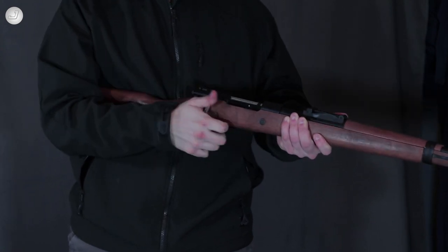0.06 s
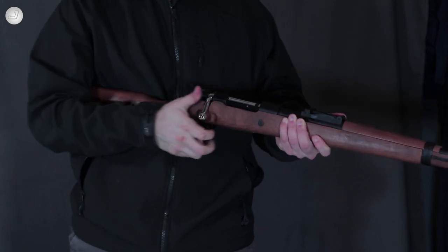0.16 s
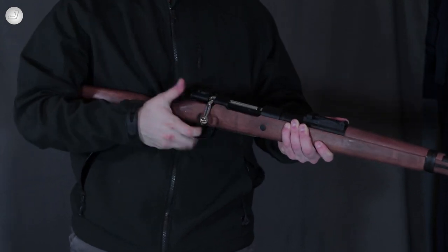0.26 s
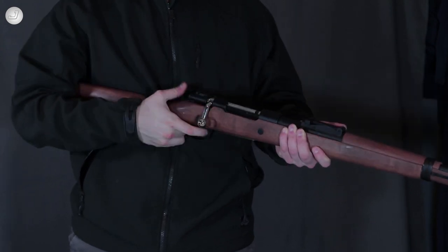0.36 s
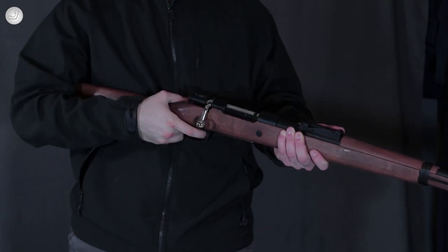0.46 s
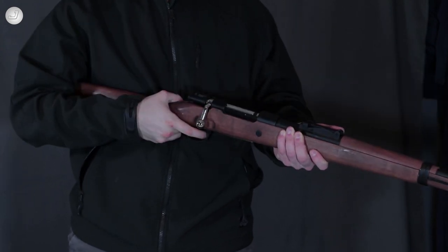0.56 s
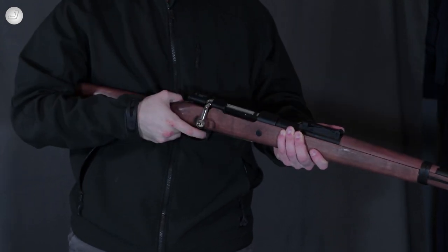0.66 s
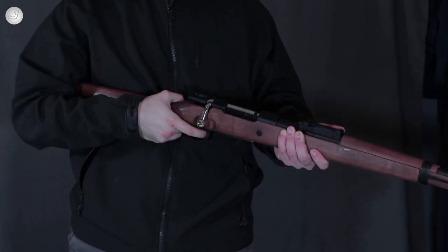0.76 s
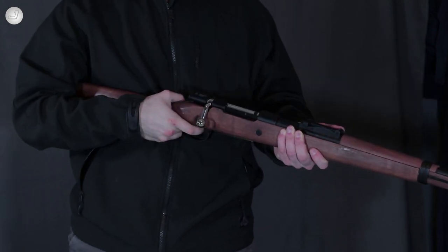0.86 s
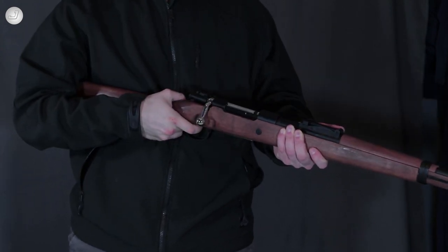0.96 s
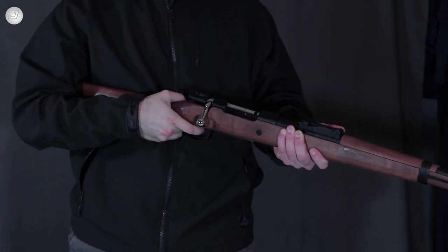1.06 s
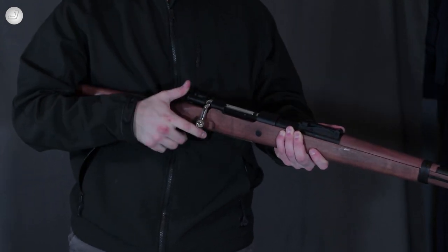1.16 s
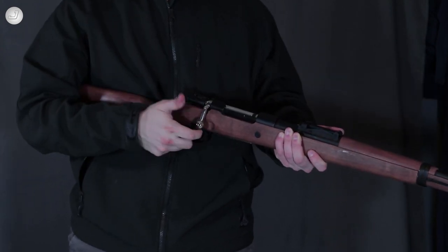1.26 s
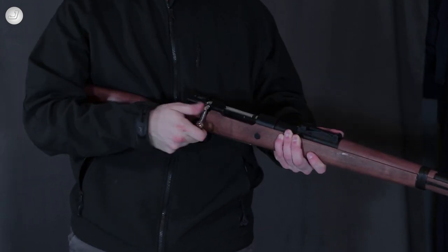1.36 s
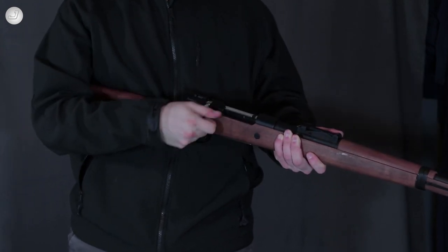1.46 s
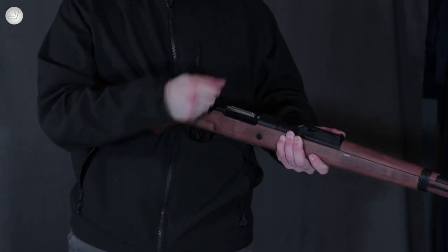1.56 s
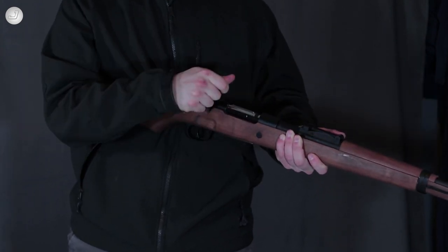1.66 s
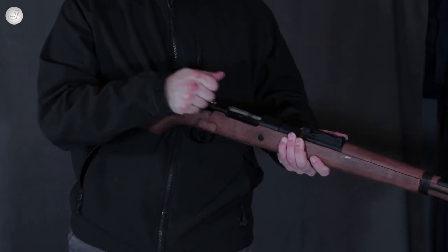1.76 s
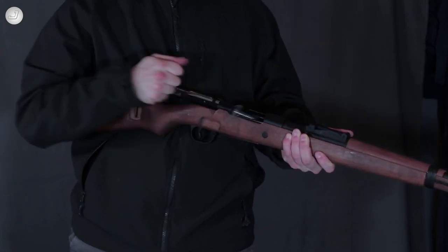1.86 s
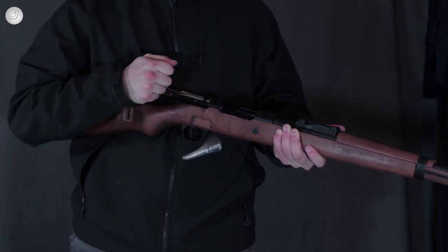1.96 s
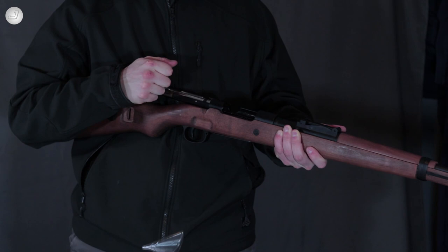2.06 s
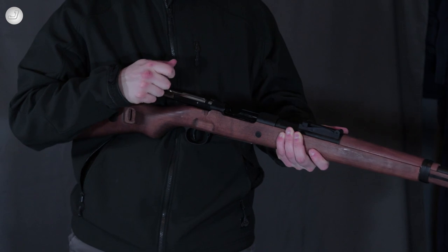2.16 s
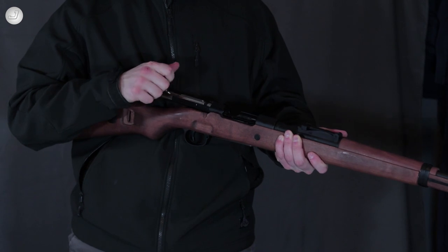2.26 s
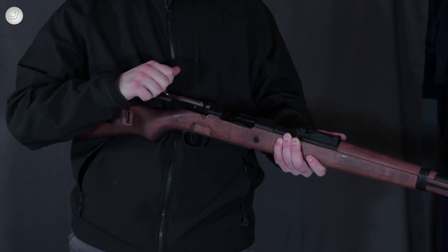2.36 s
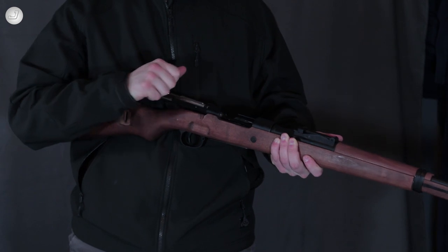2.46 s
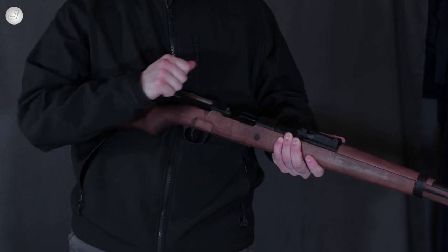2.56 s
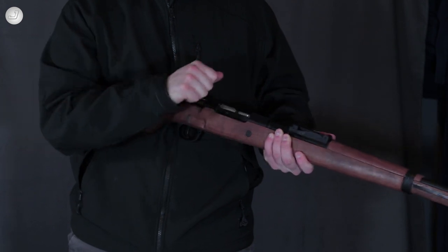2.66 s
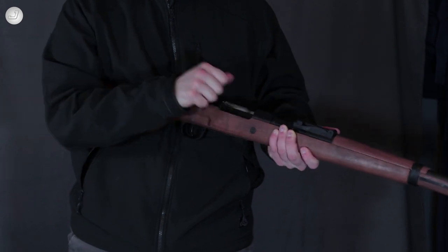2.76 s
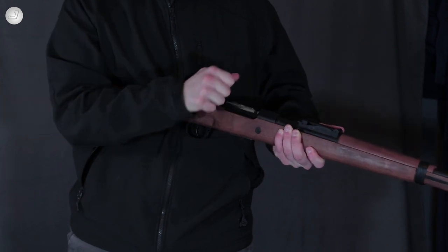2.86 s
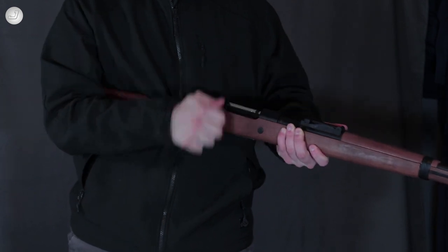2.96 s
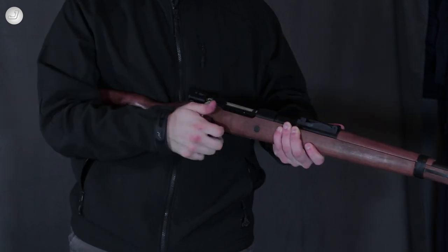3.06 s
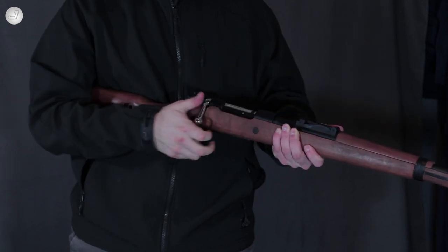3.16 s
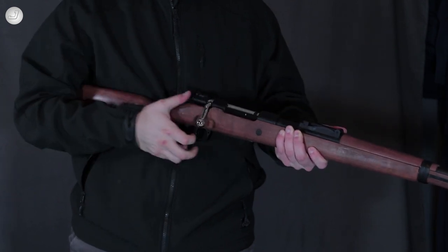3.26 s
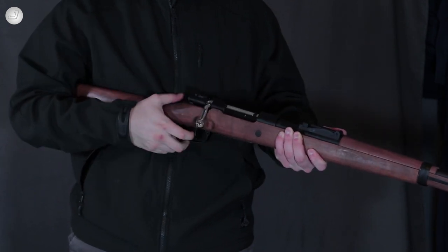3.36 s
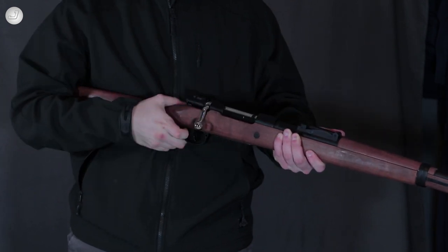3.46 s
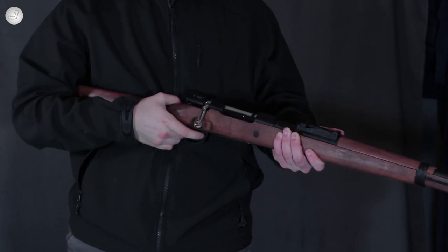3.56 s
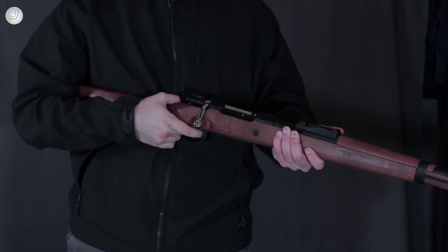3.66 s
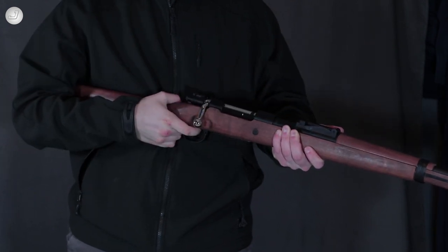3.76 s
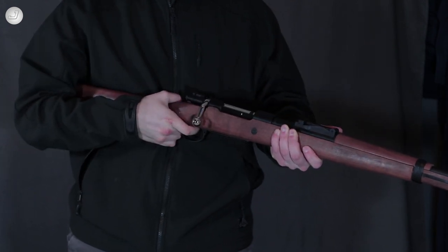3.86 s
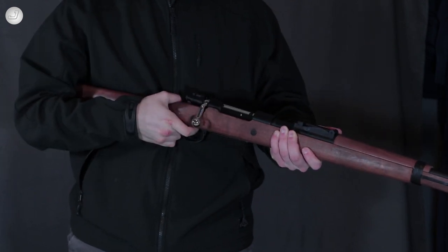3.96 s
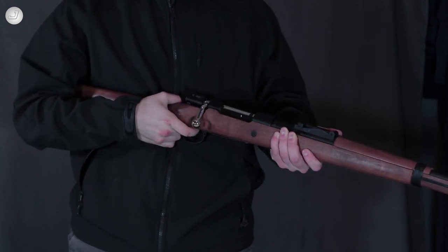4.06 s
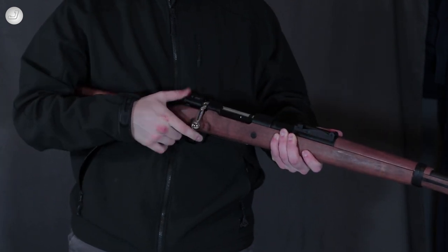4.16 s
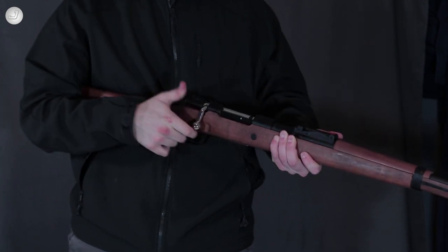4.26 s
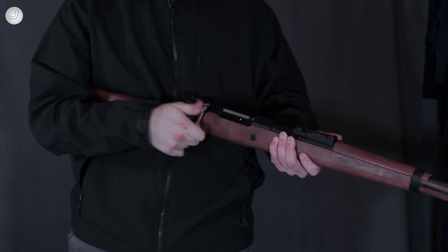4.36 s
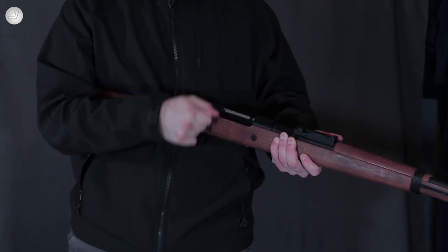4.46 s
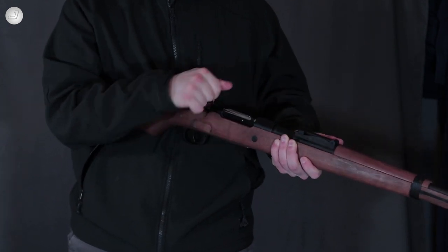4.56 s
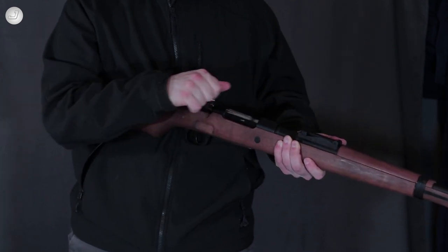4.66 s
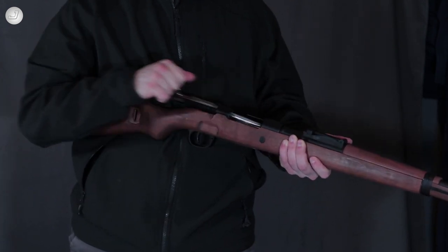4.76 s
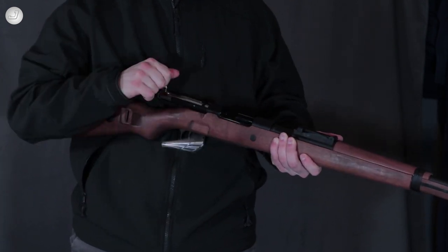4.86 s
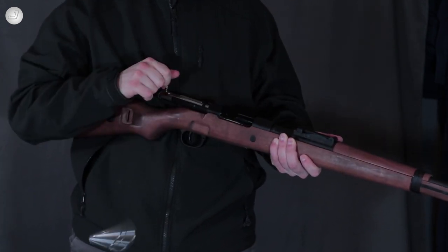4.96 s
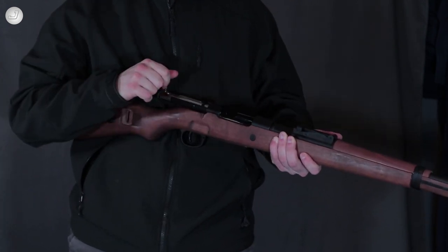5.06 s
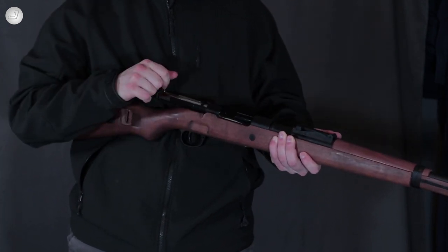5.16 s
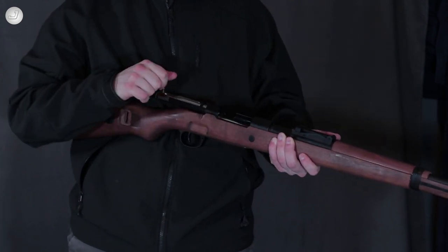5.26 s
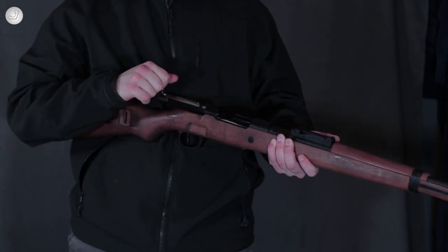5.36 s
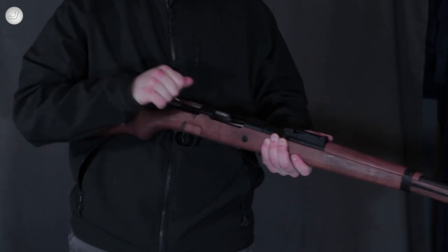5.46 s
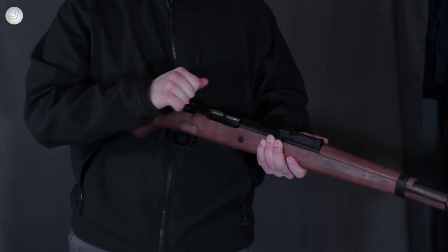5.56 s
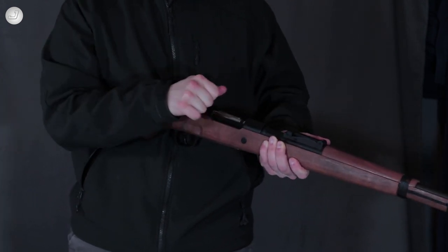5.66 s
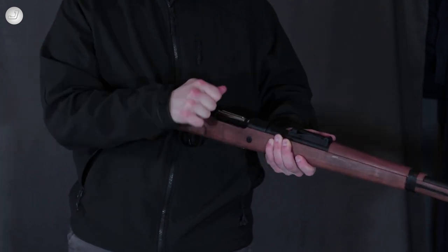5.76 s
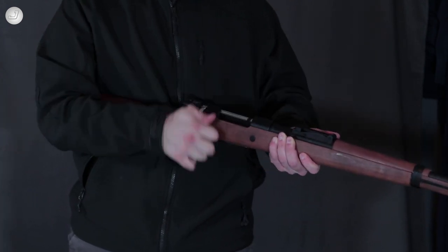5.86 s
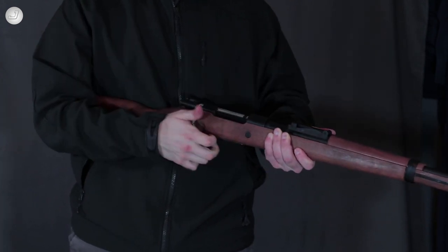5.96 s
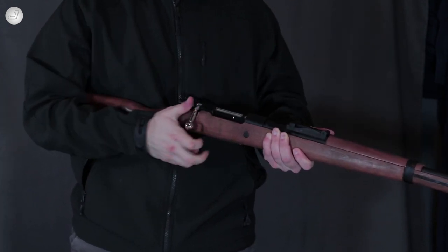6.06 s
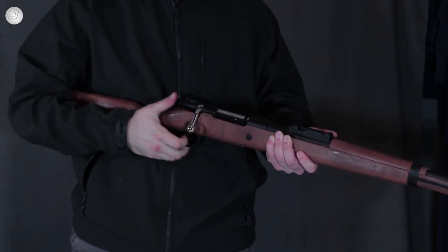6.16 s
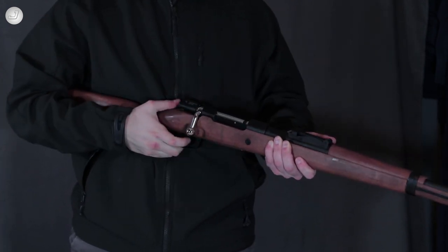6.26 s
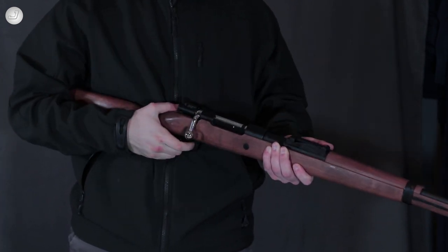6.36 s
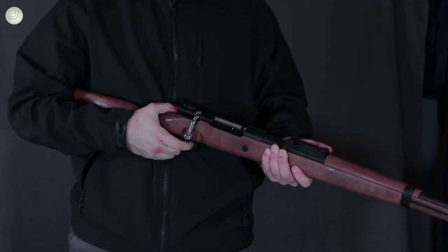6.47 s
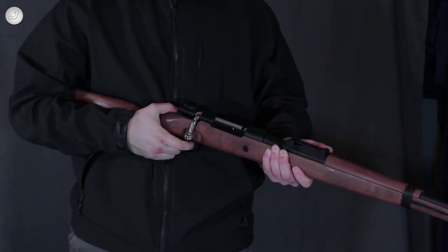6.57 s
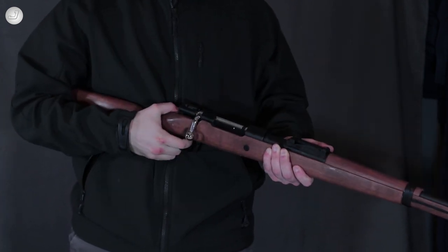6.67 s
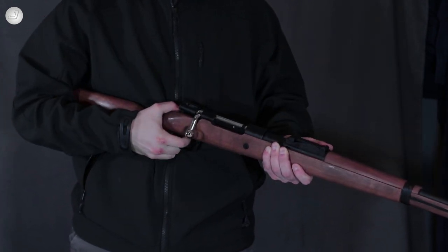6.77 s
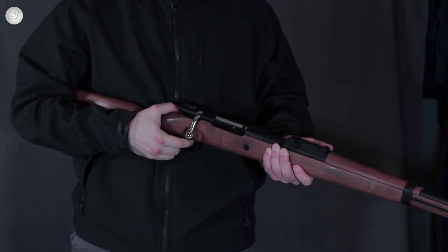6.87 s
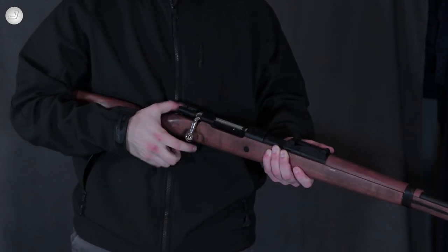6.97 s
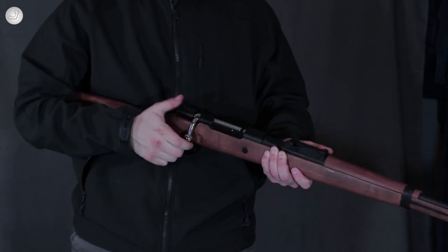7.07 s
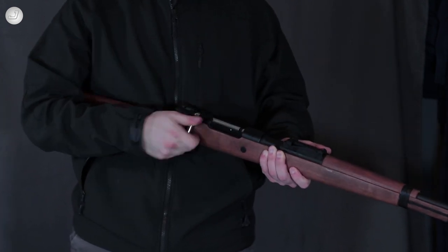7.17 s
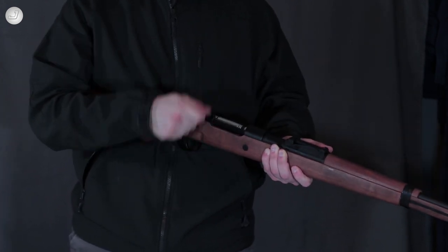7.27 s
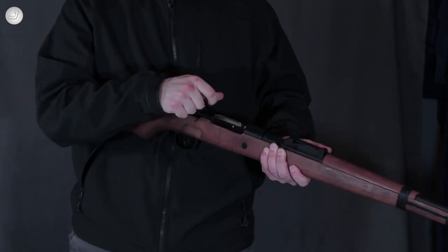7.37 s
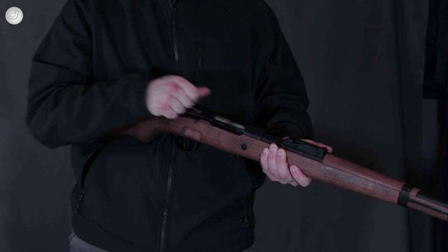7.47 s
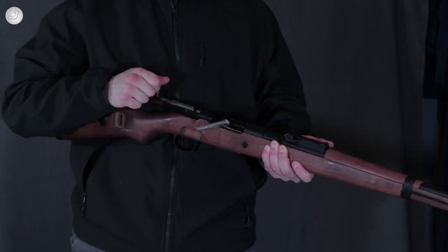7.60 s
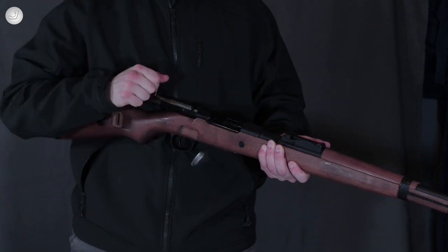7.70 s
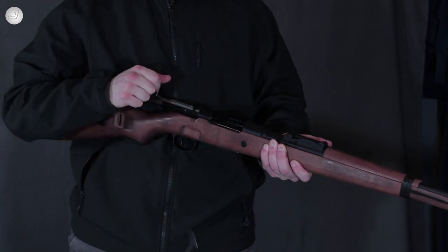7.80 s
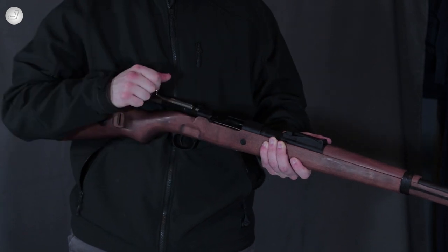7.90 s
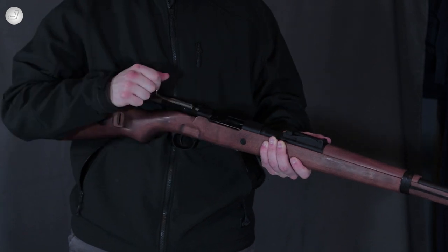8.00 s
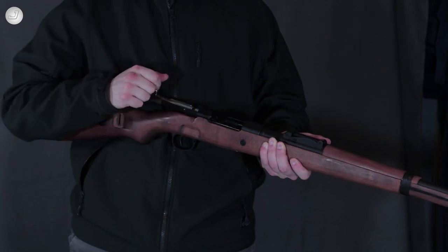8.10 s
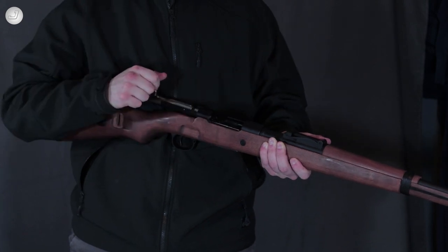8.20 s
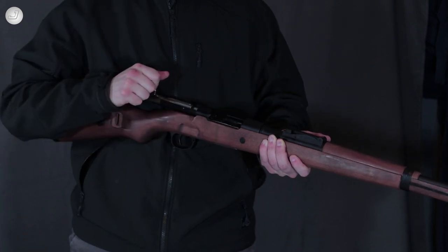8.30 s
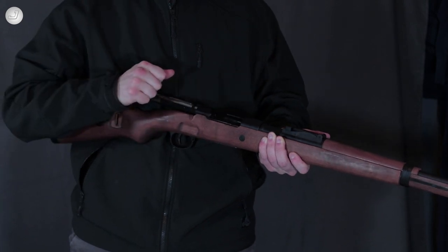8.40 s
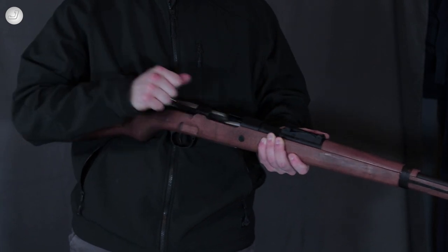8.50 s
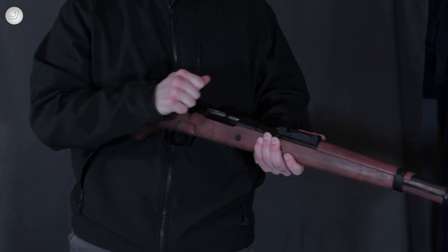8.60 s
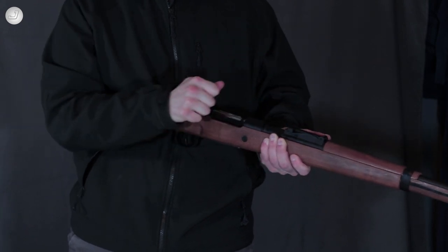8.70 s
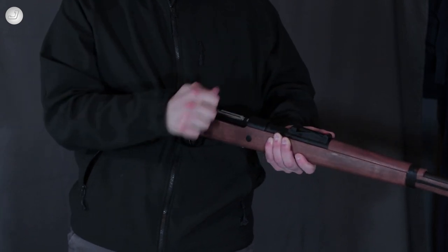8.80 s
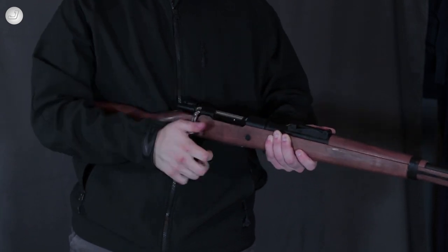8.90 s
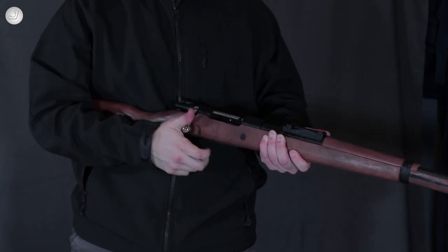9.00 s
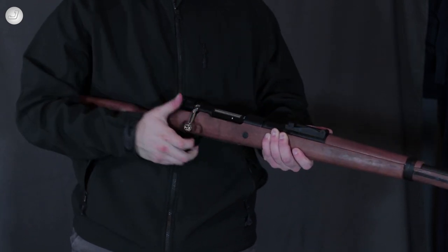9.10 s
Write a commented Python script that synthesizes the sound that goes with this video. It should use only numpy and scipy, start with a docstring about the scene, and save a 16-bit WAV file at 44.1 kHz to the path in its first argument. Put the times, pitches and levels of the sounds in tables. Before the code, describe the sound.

Steel mechanism handled near the microphone, indoors, with a very short soft echo. Each of three similar cycles starts with a punchy piston slam, followed half a second later by a bright metallic clack and quick backward scrape, a quiet gap with a dull shell landing, then a forward scrape with snaps, high spring ring or squeak, and a solid locking clunk. Slight sleeve rustle and faint hum fill the gaps.

```python
"""Spring rifle in a curtained room

A spring-powered bolt-action rifle is locked, then fired and cycled three times in a small, curtained room.
Each cycle: the sear trips, the piston slams, the handle lifts, the bolt scrapes back and throws a shell, then
runs forward with a squeak and locks. Blows and slips ring resonances of steel, wood and floor; hum, room noise
and sleeve hiss lie beneath. The recorder's compressor ducks the low hum under the loud parts.
"""
import sys
import numpy as np
from scipy import signal
from scipy.fft import rfft, irfft
from scipy.io import wavfile
from scipy.ndimage import uniform_filter1d

SR = 44100
rng = np.random.default_rng(int(sys.argv[2]) if len(sys.argv) > 2 else 0)


def dump_mix(stems):
    """Bounce the given channels to the path in sys.argv[1] as a 16-bit WAV at rate SR."""
    frames = np.atleast_2d(stems).T  # one column per channel
    limited = np.clip(frames, -1, 1)  # hard clip at full scale
    pcm = np.round(limited * 32767).astype(np.int16)
    wavfile.write(sys.argv[1], SR, pcm)


N = 403074
TIME = np.arange(N) / SR
SIZE = 16384  # samples in one blow or room tail
BINS = np.fft.rfftfreq(SIZE, 1 / SR)


def amp(db):
    """Decibels to gain."""
    return 10 ** (np.asarray(db) / 20)


def unit(x):
    """Scales to rms 1."""
    return x / np.sqrt(np.mean(x ** 2) + 1e-20)


def read(points, hz):
    """A table joined by straight lines on a log-frequency axis."""
    f, value = np.transpose(points)
    return np.interp(np.log(hz + 1), np.log(f + 1), value)


def add(mix, s, sound):
    """Mixes a sound in at time s."""
    part = mix[max(round(s * SR), 0):][:len(sound)]
    part += sound[:len(part)]


def drift(width_hz):
    """Slow random motion of rms 1."""
    lowpass = np.exp(-(np.fft.rfftfreq(N, 1 / SR) / width_hz) ** 2)
    return unit(irfft(rfft(rng.standard_normal(N)) * lowpass, N))


def noise(colour):
    """Steady noise of rms 1 with a given spectrum."""
    gain = amp(read(colour, np.fft.rfftfreq(N, 1 / SR)))
    return unit(irfft(rfft(rng.standard_normal(N)) * gain, N))


def causal(gain):
    """The impulse response that has this gain and rings only after the blow (minimum phase)."""
    log_gain = np.log(np.maximum(np.r_[gain, gain[-2:0:-1]], 1e-7))
    phase = -signal.hilbert(log_gain).imag[:len(gain)]
    return irfft(gain * np.exp(1j * phase))


def body(modes, colour):
    """Gain of an object: resonance peaks standing on a broad spectrum."""
    f = BINS + 1
    peaks = sum(amp(db) ** 2 / (1 + ((f * f - hz * hz) / (f * width)) ** 2) for hz, width, db in modes)
    return np.sqrt(peaks + amp(read(colour, f)) ** 2)


def blow(gain, db, bass_db, treble_db, decay_ms, rise_ms=.5):
    """A brief chatter of contacts rings an object; each blow has its own share of bass and treble."""
    ms = np.arange(SIZE) * 1000 / SR
    rise = 1 - np.exp(-ms / max(rise_ms, .05))
    decay = np.exp(-ms / max(decay_ms, .2))
    force = rfft(rng.standard_normal(SIZE) * decay * rise)
    # hard contacts feed all frequencies about evenly, so the object's own resonances set the note
    force = force * rfft(causal(uniform_filter1d(abs(force) ** 2, size=45) ** (-1 / 4)))
    power = abs(force * gain) ** 2 * 2 / SIZE / (.01 * SR)  # as if spread over 10 ms
    bands = [(250, 900), (900, 6500), (6500, 16000)]
    low, mid, high = (10 * np.log10(power[(BINS > a) & (BINS < b)].sum()) for a, b in bands)
    # db sets the middle band; bass and treble are relative to it
    tilt = [(600, bass_db - low), (1200, -mid), (5200, -mid), (8000, treble_db - high)]
    return irfft(force * rfft(causal(gain * amp(db + read(tilt, BINS)))))


def blows(rows, modes, colour, shift_db=0, **contact):
    """All the blows on one object; each lands on another spot and so favours other resonances."""
    out = np.zeros(N)
    spots = rng.standard_normal((len(rows), len(modes)))
    for (s, *row), spot in zip(rows, spots):
        struck = [(hz, width, db + shift_db * luck) for (hz, width, db), luck in zip(modes, spot)]
        add(out, s, blow(body(struck, colour), *row, **contact))
    return out


# mains hum and a fan: (pitch [Hz], level [dB rms], wander [Hz rms])
HUM_LINES = [(50.7, -57, .05), (157, -54.5, 2.4), (219, -59, 9.1), (249, -62.5, 6), (362, -67, 2.9),
             (566, -62.5, 2)]
# room noise spectrum: (frequency [Hz], relative density [dB per Hz])
ROOM_NOISE_COLOUR = [(20, -14), (40, -10.5), (65, -15), (96, -16.5), (130, -3.5), (185, -5.5), (230, -11),
                     (390, -7.5), (600, -12.5), (1060, -15), (1860, -19.5), (2800, -26.5), (7000, -31.5),
                     (16000, -33.5)]
ROOM_NOISE_DB = -52  # rms


def background():
    """Room noise with wavering hum lines."""
    hum = np.zeros(N)
    for hz, db, wander in HUM_LINES:
        phase = 2 * np.pi * np.cumsum(hz + wander * drift(12.27)) / SR
        hum += amp(db) * np.sqrt(2) * np.sin(phase)
    return hum + amp(ROOM_NOISE_DB) * noise(ROOM_NOISE_COLOUR)


RUB_ATTACK_S, RUB_RELEASE_S = 0.0046, 0.0073


def held(start, end, attack_s):
    """Attack, hold and release of one movement."""
    corners = [start - attack_s / 2, start + attack_s / 2, end, end + RUB_RELEASE_S]
    return np.interp(TIME, corners, [0, 1, 1, 0])


# the handle is turned down into its seat: (start [s], seated [s], relative friction [dB],
# relative blow level [dB], bass [dB re mid band], treble [dB re mid band])
HANDLE_CLOSINGS = [(0, 0.1066, -37, -29.5, -4.5, -12.5), (3.051, 3.118, -38, -22, -6, -15.5),
                   (5.89, 6.013, -48.5, -25, -5, -16.5), (8.952, 9.008, -35, -21, -9, -17)]
# the handle is lifted until it clacks open: (start [s], open [s], relative friction [dB], clack [dB])
HANDLE_LIFTS = [(1.56, 1.693, -43, -16), (4.54, 4.6581, -45.5, -17), (7.304, 7.423, -46, -13)]
# the hand leans on the open bolt before a push: (start [s], end [s], relative friction [dB])
BOLT_LEANS = [(2.573, 2.629, -35.5), (8.533, 8.578, -43)]


def turning():
    """Steel rubs steadily while the handle turns or the hand leans on the bolt."""
    force = np.zeros(N)
    for start, end, db, *_ in HANDLE_LIFTS + BOLT_LEANS + HANDLE_CLOSINGS:
        force += amp(db) * held(start, end, RUB_ATTACK_S)
    return force


def friction():
    """How hard steel rubs on steel, in dB: steady in a turn, an arch in a pull, two swells in a push."""
    return 20 * np.log10(turning() + drawing() + pushing() + 1e-6)


# resonances of the steel action: (centre [Hz], width [Hz], relative level [dB])
ACTION_MODES = [(487, 82, 8), (703, 110, 10), (1024.5, 72, 17), (1277, 59, 17), (1427, 89, 14),
                (1700, 80, 13.5), (2088, 120, 10), (2425, 80, 11.5), (3014, 86, 11), (3540, 430, 10.5),
                (5050, 270, 11.5), (5615, 470, 12.5), (7950, 30, 2.5), (9800, 1000, -1), (11160, 57, 4),
                (14950, 60, -2)]
# broad spectrum of steel beneath its resonances: (frequency [Hz], relative level [dB])
STEEL_SPECTRUM = [(40, -21), (250, -22), (500, 1.5), (2000, 8.5), (4300, 4.5), (7000, -2), (11000, -2.5),
                  (14000, -3), (16000, -9)]
RATTLE_GRAIN_DB, RATTLES_PER_S = 2.5, 4000  # spread of slip sizes; mean slip rate
STICKING_DB = -58  # friction level below which the steel is at rest


def scrape(friction_db, level_db=-2, judder_db=3.5, shift_db=6.5, ring_db=1, treble_db=1,
           bright_at_db=-26, brighten=0.59):
    """Tiny slips ring the action; its resonances swell and fade as the point of contact moves."""
    sizes = rng.choice([-1., 1.], N) * amp(RATTLE_GRAIN_DB * np.minimum(rng.exponential(1, N), 2))
    slips = sizes * (rng.random(N) < RATTLES_PER_S / SR)
    rub = signal.oaconvolve(slips, causal(amp(read(STEEL_SPECTRUM, BINS))))[:N]
    for hz, width, db in ACTION_MODES:
        mode = signal.lfilter(*signal.iirpeak(hz, hz / width, SR), slips)
        rub += amp(db + ring_db + shift_db * drift(31)) * mode
    moving = np.maximum(amp(friction_db) - amp(STICKING_DB), 0)  # steel at rest is silent
    rub = unit(rub) * moving * amp(level_db + judder_db * drift(60))
    treble = signal.sosfiltfilt(signal.butter(3, 6500, "high", fs=SR, output="sos"), rub)
    # harder rubbing is brighter
    treble_gain = amp(treble_db + brighten * np.minimum(friction_db - bright_at_db, 6))
    return rub + treble * (treble_gain - 1)


# chance jolts during any rubbing: rate, then level and spread relative to the friction
JOLTS_PER_S, JOLT_DB, JOLT_SPREAD_DB = 40, -3, 2.5


def jolts(friction_db):
    """Small chance knocks wherever steel rubs, about as strong as the rubbing: (time [s], level [dB])."""
    chance, size = rng.random(N), rng.standard_normal(N)
    at = np.flatnonzero((chance < JOLTS_PER_S / SR) & (friction_db > STICKING_DB))
    return list(zip(TIME[at], friction_db[at] + JOLT_DB + JOLT_SPREAD_DB * size[at]))


def touched(events, touch, brighten=0):
    """Gives (time, level) events the touch of their kind; the harder ones may be brighter."""
    bass_db, treble_db, decay_ms = touch
    usual_db = np.mean([db for s, db in events])
    return [(s, db, bass_db, treble_db + brighten * (db - usual_db), decay_ms) for s, db in events]


# cam and lugs tick while the handle turns: (time [s], level [dB], treble [dB re mid band])
TURN_TICKS = [(.0571, -30, -24), (1.584, -38, -13), (1.6225, -38.5, -12), (1.667, -31.5, -13),
              (3.0263, -30.5, -13.5), (3.0532, -30, -20), (3.0793, -29, -11), (4.528, -41, -32),
              (4.5572, -30.5, -17), (4.5809, -37, -19), (4.6235, -28.5, -16), (4.6525, -30, -10),
              (5.9098, -29, -10.5), (5.9653, -29.5, -13), (7.2645, -46.5, -24), (7.3257, -46, -32),
              (7.4033, -32, -20), (8.9159, -30, -8), (8.9613, -23, -11), (8.9707, -30, -12)]
# the rifle rattles dully as the hand shifts its grip: (time [s], level [dB])
GRIP_SHIFTS = [(1.1975, -32), (1.2155, -36), (2.5332, -41), (4.177, -36), (4.2259, -38), (4.3363, -44),
               (7.0207, -36.5), (7.029, -41)]
# the loose bolt knocks in its raceway: (time [s], level [dB])
RACEWAY_KNOCKS = [(1.9089, -18), (2.6192, -30.5), (2.828, -36), (2.8704, -27.5), (2.8869, -21),
                  (4.8247, -13.5), (5.5456, -18), (5.7098, -29.5), (5.7524, -23), (7.6236, -18.5),
                  (8.5233, -29.5), (8.599, -25.5)]
# a shell snaps past the ejector or the feed lips: (time [s], level [dB])
SHELL_SNAPS = [(1.9395, -16), (2.6043, -24), (2.7348, -11.5), (4.8441, -22), (4.853, -20), (5.5228, -23),
               (5.6049, -14.5), (7.6042, -20), (7.6586, -29), (8.5804, -28.5), (8.6349, -11.5),
               (8.6399, -18.5)]
# the touch of each kind of contact: (bass [dB re mid band], treble [dB re mid band], contact decay [ms])
SEAR_FEEL = (-5, -4.5, 5.57)
OPEN_FEEL = (-11, -7, 4.8)
TUG_FEEL = (-17, -12.5, 4.3)
REAR_STOP_FEEL = (-13.5, -1.5, 4.7)
FRONT_STOP_FEEL = (-15, -7, 5.8)
DETENT_FEEL = (-28, -2, 3.4)
KNOCK_FEEL = (-17.5, -10.5, 3.4)
SNAP_FEEL = (-16, -1.6, 6.1)
GRIP_FEEL = (-9.5, -21.5, 3.3)
JOLT_FEEL = (-10.5, -10, 2.7)
CAM_BASS_DB, CAM_DECAY_MS = -13.5, 3.6
SEAR_LEAD_S = .0075  # the sear trips just before the slam
DETENT_LEAD_S, DETENT_DB = 0.0079, -36  # the detent clicks just before the handle seats
BRIGHTEN = 0.54  # dB of treble gained for each dB that a jolt or rattle is harder


def contacts(friction_db):
    """Blows on the steel action: fire, lift, pull, push, close, and the rattles between."""
    rows = touched([(s - SEAR_LEAD_S, db) for s, db, *_ in SHOTS], SEAR_FEEL)
    rows += touched([(s, db) for _, s, _, db in HANDLE_LIFTS], OPEN_FEEL)
    rows += touched([(s, db) for s, _, db, *_ in BOLT_PULLS], TUG_FEEL)
    rows += touched([(s, db) for _, s, *_, db in BOLT_PULLS], REAR_STOP_FEEL)
    rows += touched([(s, db) for _, _, s, *_, db in BOLT_PUSHES], FRONT_STOP_FEEL)
    rows += touched([(s - DETENT_LEAD_S, DETENT_DB) for _, s, *_ in HANDLE_CLOSINGS], DETENT_FEEL)
    rows += [(s, db, CAM_BASS_DB, treble_db, CAM_DECAY_MS) for s, db, treble_db in TURN_TICKS]
    rows += touched(RACEWAY_KNOCKS, KNOCK_FEEL)
    rows += touched(SHELL_SNAPS, SNAP_FEEL)
    rows += touched(GRIP_SHIFTS, GRIP_FEEL, BRIGHTEN)
    rows += touched(jolts(friction_db), JOLT_FEEL, BRIGHTEN)
    return blows(rows, ACTION_MODES, STEEL_SPECTRUM, shift_db=3, rise_ms=0.92)


# steel left ringing, a shell knocked about or the cocked bolt:
# (time [s], pitch [Hz], starting level [dB], time to fall 60 dB [s])
CLEAR_NOTES = [(.057, 3450, -28, .08), (1.987, 1440, -26, .27), (2.605, 11400, -29, .2),
               (2.605, 14750, -32, .12), (4.826, 1017, -23, .1), (4.855, 1017, -24, .12),
               (4.903, 1017, -30, .52), (5.546, 1050, -16, .05), (5.607, 1050, -20, .09),
               (7.021, 2078, -41, .11), (7.424, 2440, -18, .18), (7.606, 1017, -24, .12),
               (7.683, 1017, -29.5, .6), (8.784, 2450, -21, .16)]


def ringing():
    """Shells and bolt ring on in clear, exponentially dying notes, some of them together."""
    out, t = np.zeros(N), np.arange(SR) / SR
    for s, hz, db, t60 in CLEAR_NOTES:
        add(out, s, amp(db - 60 * t / t60) * np.sin(2 * np.pi * hz * t))
    return out


# resonances of the bolt handle and its seat: (centre [Hz], width [Hz], relative level [dB])
HANDLE_MODES = [(512, 40, 29), (714, 86, 31), (1020, 110, 28), (1220, 120, 23), (1226, 57, 33.5),
                (1382, 104, 32.5), (1650, 63, 18.5), (2240, 100, -4), (3140, 50, 15), (3430, 250, 15.5),
                (5080, 300, -6.5), (5560, 170, 19), (7700, 20, 14), (11300, 76, 21), (13300, 76, 19)]


def locks():
    """The handle strikes its seat, and both ring."""
    rows = [(s, *lock) for _, s, _, *lock in HANDLE_CLOSINGS]
    return amp(7.0) * blows(rows, HANDLE_MODES, STEEL_SPECTRUM, decay_ms=4.1, rise_ms=2.7)


# the sleeve brushes the jacket: (start [s], end [s], relative level [dB])
SLEEVE_BRUSHES = [(.24, .46, -56), (3.31, 3.52, -56), (6.15, 6.4, -57), (2.15, 2.55, -60)]


def sleeve(grain_db=2.0):
    """Soft swells of cloth hiss."""
    swell = np.zeros(N)
    for start, end, db in SLEEVE_BRUSHES:
        add(swell, start, amp(db) * signal.windows.tukey(max(round((end - start) * SR), 2), .7))
    cloth = noise([(100, -6), (1000, 6.5), (3000, 1.0), (5500, 0.0), (8000, -7.0), (16000, -6)])
    return swell * amp(grain_db * drift(98)) * cloth


# the finger takes up the slack of the trigger:
# (time [s], level over 10 ms [dB], bass [dB re mid band], treble [dB re mid band])
SLACK_TICKS = [(.9329, -35.5, -23, -13), (3.8719, -36.5, -19.5, -14.5), (6.7462, -40.5, -27, -15)]
# resonances of the trigger: (centre [Hz], width [Hz], relative level [dB])
TRIGGER_MODES = [(1700, 180, 3.5), (2650, 200, 3.5), (3530, 630, 15), (5000, 500, 10), (6140, 297, 16.5),
                 (7580, 280, 21.5)]


def trigger():
    """A light tick rings the trigger as its slack is taken up."""
    return blows(SLACK_TICKS, TRIGGER_MODES, STEEL_SPECTRUM, decay_ms=5.2, rise_ms=.4)


# the sear trips, then the piston hits the cylinder head: (slam time [s], sear level [dB],
# slam level [dB], slam bass [dB re mid band], slam treble [dB re mid band])
SHOTS = [(1.057, -14, 0, -4, -4.5), (4.0449, -12.5, -1, -5, -5), (6.8481, -12.5, -1.5, -3.5, -5)]
# resonances of the cylinder in its wooden stock: (centre [Hz], width [Hz], relative level [dB])
STOCK_MODES = [(84.6, 21, 0), (317, 160, 7.5), (460, 92, 7.5), (635, 84, 10), (740, 130, 15),
               (977, 100, 16.5), (1230, 60, 10.5), (1536, 70, 10), (1750, 81, 6), (2080, 62, 15),
               (2430, 100, 13), (3140, 110, 13), (3820, 250, 4.5), (5100, 390, 7), (11000, 1300, 3)]
# broad spectrum of the slam beneath the resonances: (frequency [Hz], relative level [dB])
SLAM_SPECTRUM = [(20, -9), (100, -10), (250, 1.5), (1000, 0), (4000, 3), (7000, 2.5), (12000, -1),
                 (16000, -8)]


def slams():
    """The piston hits the cylinder head and rings the cylinder in its wooden stock."""
    rows = [(s, *slam) for s, _, *slam in SHOTS]
    return blows(rows, STOCK_MODES, SLAM_SPECTRUM, shift_db=1.5, decay_ms=4, rise_ms=2.2)


# the bolt is tugged free and drawn to its rear stop:
# (start [s], stop [s], tug [dB], relative friction [dB], stop [dB])
BOLT_PULLS = [(1.887, 1.9859, -23, -22, -12.5), (4.8034, 4.9011, -19.5, -23.5, -15),
              (7.5844, 7.682, -15.5, -21, -15)]
PULL_LEAD_S, PULL_ARCH_DB = 0.037, 5.5  # the rubbing starts before the tug and is strongest halfway


def drawing():
    """Rubbing force of the bolt drawn back, an arch over its travel."""
    force = np.zeros(N)
    for start, stop, _, db, _ in BOLT_PULLS:
        travel = np.clip((TIME - start) / (stop - start), 0, 1)
        arch = amp(db - PULL_ARCH_DB * (2 * travel - 1) ** 2)
        force += arch * held(start - PULL_LEAD_S / 2, stop, PULL_LEAD_S) ** 2
    return force


# the spring is set singing: (time [s], relative level [dB])
SPRING_STARTS = [(1.99, -39), (2.74, -25), (4.905, -31), (5.605, -12.5), (5.659, -26), (7.684, -42),
                 (8.639, -12), (8.665, -37)]


def spring(spring_hz=9880, spring_width_hz=220, spring_t60=0.23, level_db=-1.5):
    """The spring sings in a tight cluster of high notes."""
    sway, t = np.zeros(N), np.arange(SR) / SR
    for s, db in SPRING_STARTS:
        add(sway, s, amp(db + level_db - 60 * t / spring_t60))
    phase = 2 * np.pi * spring_hz * TIME
    cluster = drift(spring_width_hz) * np.sin(phase) + drift(spring_width_hz) * np.cos(phase)
    return sway * cluster / 2


# a shell lands on the soft floor:
# (time [s], level over 10 ms [dB], bass [dB re mid band], treble [dB re mid band])
SHELL_LANDINGS = [(2.336, -43, 2, -28), (5.259, -41, 2.5, -15), (8.067, -45, -2, -25)]
# resonances of the floor under a shell: (centre [Hz], width [Hz], relative level [dB])
FLOOR_MODES = [(111, 31, 31), (432, 70, 21), (685, 120, 18), (1200, 210, 17.5), (1580, 170, 8)]


def shells():
    """Each thrown shell thuds on the floor and rings its low resonances."""
    return blows(SHELL_LANDINGS, FLOOR_MODES, STEEL_SPECTRUM, decay_ms=9.15, rise_ms=2.0)


# the bolt squeaks on its way forward: (start [s], length [s], first pitch [Hz], climb [Hz per s],
# top pitch [Hz], relative level [dB])
BOLT_SQUEAKS = [(2.687, 0.037, 1506, 245000, 11500, -13), (5.521, 0.032, 2865, 25000, 3700, -19),
                (5.551, 0.052, 3850, 133600, 7330, -16)]
# lifts the squeak's octave as it sweeps through: (centre [Hz], width [Hz], octave level [dB])
OCTAVE_RESONANCE = (12400, 1200, 5.2)


def squeaks(jitter=0.053, chatter=0.51, swell=1.5):
    """Chattering stick and slip whose rate climbs to a top pitch."""
    out = np.zeros(N)
    ring_hz, width_hz, ring_db = OCTAVE_RESONANCE
    for start, length, first_hz, climb, top_hz, db in BOLT_SQUEAKS:
        t = np.arange(0, length, 1 / SR)
        hz = np.minimum(first_hz + climb * t, top_hz)
        phase = 2 * np.pi * np.cumsum(hz * (1 + jitter * drift(700)[:len(t)])) / SR
        octave = amp(ring_db) / np.hypot(1, 2 * (2 * hz - ring_hz) / width_hz) * (hz < SR / 4)
        tone = np.sin(phase) + octave * np.sin(2 * phase)
        tone *= 1 + chatter * drift(1500)[:len(t)]
        add(out, start, amp(db) * tone * abs(np.sin(np.pi * t / length)) ** swell)
    return out


# the bolt strips a shell, coasts and runs home: (start [s], shell free [s], home [s],
# relative stripping friction [dB], relative chambering friction [dB], stop [dB])
BOLT_PUSHES = [(2.689, 2.727, 2.894, -29, -30, -16), (5.523, 5.63, 5.7594, -24, -21.5, -15.5),
               (8.576, 8.649, 8.7833, -26.5, -23.5, -15)]
STRIP_SWELL_DB, COAST_DB_PER_S, CHAMBER_DB_PER_S = 2, 284, 350


def pushing():
    """Rubbing force of the bolt run forward: a swell as it strips a shell, another as it chambers it."""
    force = np.zeros(N)
    for start, free, home, strip_db, chamber_db, _ in BOLT_PUSHES:
        to_go = np.clip((free - TIME) / (free - start), 0, 1)
        swell_db = STRIP_SWELL_DB / 2 - STRIP_SWELL_DB * to_go
        coast_db = COAST_DB_PER_S * np.maximum(TIME - free, 0)
        stripping = amp(strip_db + swell_db - coast_db)
        chambering = amp(chamber_db - CHAMBER_DB_PER_S * np.maximum(home - TIME, 0))
        force += (stripping + chambering) * held(start, home, RUB_ATTACK_S)
    return force


# first reflections from the floor, the body and nearby walls: (delay [s], level [dB re direct])
REFLECTIONS = [(.0043, -18.5), (0.011, -22), (0.016, -19.5), (.0208, -24.5), (.0285, -30.5)]


def echoes(x, dull_hz=5000):
    """Single early reflections reach the microphone, dulled by cloth."""
    soft = signal.lfilter(*signal.butter(1, min(dull_hz, SR / 3), fs=SR), x)
    out = np.zeros(N)
    for delay, db in REFLECTIONS:
        add(out, delay, amp(db) * soft)
    return out


# decay of the curtained room: (frequency [Hz], time to fall 60 dB [s])
ROOM_DECAY = [(150, .3), (660, 0.27), (1400, 0.24), (2600, 0.24), (4600, 0.27), (12000, 0.18),
              (16000, 0.21)]
# tone of the room's tail: (frequency [Hz], relative level [dB])
TAIL_COLOUR = [(100, -10.5), (400, -3), (1000, 1), (2500, -1), (6000, -6), (11000, 0), (16000, -9.5)]


def room(x, gap_s=0.002, build_s=0.0041, count=3):
    """Short diffuse tails of random reflections, blended in slowly changing shares."""
    out = np.zeros(N)
    for k in range(count):
        taps = rng.choice([-1., 1.], SIZE * 2) * (rng.random(SIZE * 2) < 5000 / SR)
        hz, t, z = signal.stft(taps, SR, nperseg=256)
        decay = amp(-60 * t / read(ROOM_DECAY, hz)[:, None])
        tail = signal.istft(z * decay, SR, nperseg=256)[1][:SIZE]
        tail *= np.clip((TIME[:SIZE] - gap_s) / build_s, 0, 1)
        tail = signal.fftconvolve(tail / np.linalg.norm(tail), causal(amp(read(TAIL_COLOUR, BINS))))[:SIZE]
        share = np.cos(np.pi * (TIME * 1.3 + k / count)) * np.sqrt(2 / count)
        out += signal.oaconvolve(x * share, tail)[:N]
    return out


def scene():
    """The rifle, the shells and the room, as they reach the microphone."""
    friction_db = friction()
    steel = contacts(friction_db) + trigger()
    slam, lock, shell = slams(), locks(), shells()
    sliding = scrape(friction_db) + squeaks() + spring()
    direct = steel + slam + lock + shell + sliding
    # each source excites the room by its own share
    to_room = amp(-3.5) * steel + amp(-7.0) * slam + amp(-4.5) * lock
    to_room += amp(-8.5) * shell + amp(-2.5) * sliding
    return (direct + echoes(direct) + room(to_room) + ringing() + sleeve() + background())[None]


EDGE_HZ = 16000  # upper band limit


def record(dry, threshold_db=-26.5, slope=0.58, detector_s=0.039, recovery_db_per_s=100):
    """A compressor that follows the sound's power, clipping at full scale, then the band limit."""
    r = np.exp(-1 / (detector_s * SR))
    power_db = 10 * np.log10(signal.lfilter([1 - r], [1, -r], dry[0] ** 2) + 1e-12)
    wanted_db = slope * np.maximum(power_db - threshold_db, 0)
    # the cut rises at once but recovers at a steady rate
    fall = TIME * recovery_db_per_s
    cut_db = np.maximum.accumulate(wanted_db + fall) - fall
    out = np.clip(dry / amp(uniform_filter1d(cut_db, size=88)), -1, 1)
    band_limit = signal.firwin(255, EDGE_HZ, window=("kaiser", 8), fs=SR)
    return signal.oaconvolve(out, band_limit[None], "same")


dry = scene()
out = record(dry)
dump_mix(out)
```